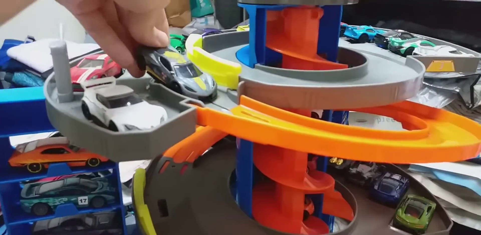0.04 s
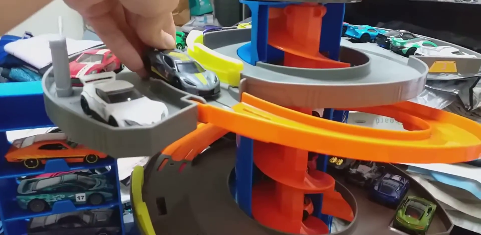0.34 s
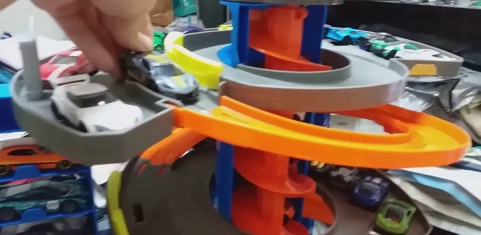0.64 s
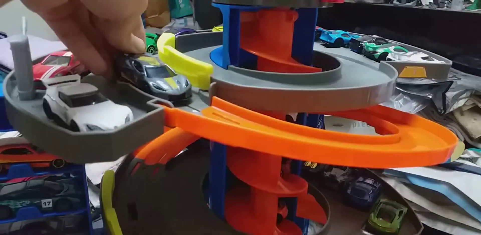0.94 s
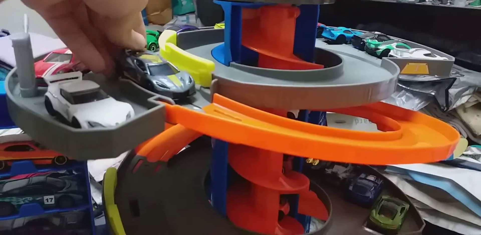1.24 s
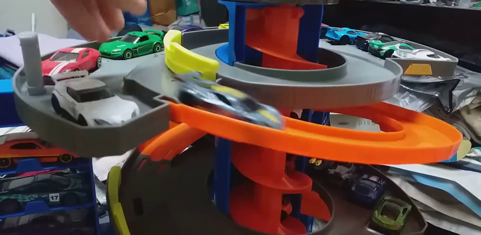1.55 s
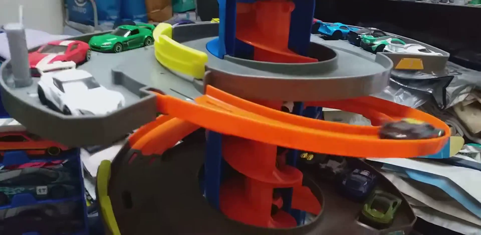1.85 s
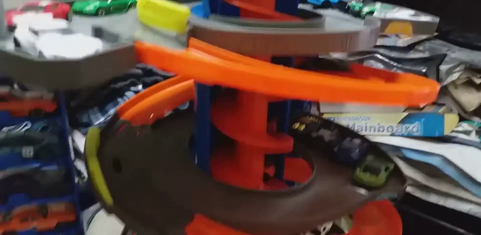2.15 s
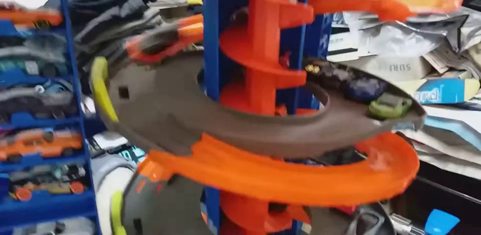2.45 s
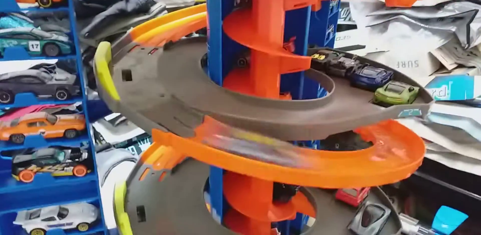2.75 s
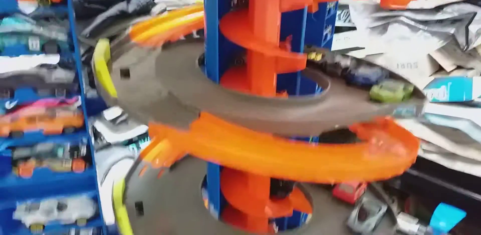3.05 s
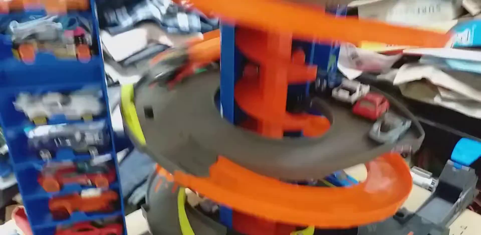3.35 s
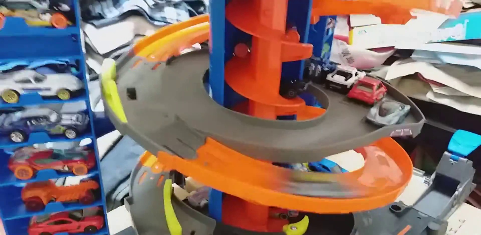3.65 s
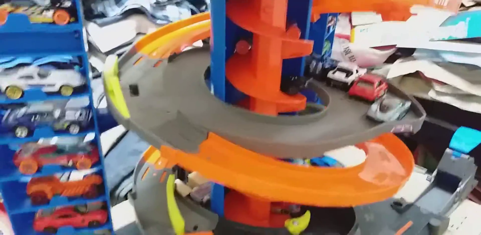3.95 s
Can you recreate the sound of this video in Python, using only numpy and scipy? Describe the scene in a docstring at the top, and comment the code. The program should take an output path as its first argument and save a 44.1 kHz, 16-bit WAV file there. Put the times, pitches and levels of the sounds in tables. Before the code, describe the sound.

A small metal toy car rattles down a plastic spiral track, close by in a quiet room. At first there is only soft hiss and a faint, dull tap at about 0.5 seconds. Near 1.4 seconds the car clacks onto the track and rolls, wheels chattering over a hollow rumble. From 2 seconds it grows louder, with sharp clacks, brief scrapes and knocks continuing until about 4 seconds.

```python
"""A die-cast toy car rattles down a plastic spiral track, close to one microphone in a quiet room.
After a dull tap while it is held, the car is let go. Its hard wheels chatter over the plastic and
make the track sing and rumble; the metal body clacks against walls and joints and scrapes the outer
wall, and the bigger blows knock the hollow tower. Short echoes shift as the car circles, over a
few low thumps like handling noise, a soft hiss and a faint hum."""
import sys
import numpy as np
from scipy import signal
from scipy.io import wavfile
from scipy.ndimage import uniform_filter1d, map_coordinates

SR = 44100
rng = np.random.default_rng(int(sys.argv[2]) if len(sys.argv) > 2 else 0)


def waveform_to_disk(signal):
    """Save audio, clipped to [-1, 1], as 16-bit WAV at the path in sys.argv[1]."""
    frames = np.transpose(np.atleast_2d(signal))
    scaled = np.clip(frames, -1, 1) * 32767
    samples = np.round(scaled).astype(np.int16)
    wavfile.write(sys.argv[1], SR, samples)


N = 176400
TIME = np.arange(N) / SR
CLACK_S = 0.004  # a clack's or ping's level is its energy spread over this span


def amp(db):
    """Decibels to gain."""
    return 10 ** (np.asarray(db) / 20)


def unit(x):
    """Scales to rms 1."""
    return x / np.sqrt(np.mean(x ** 2) + 1e-20)


def at_hz(points, hz):
    """Reads a table on a log-frequency axis."""
    freq_hz, value = np.transpose(points)
    return np.interp(np.log(hz + 1), np.log(freq_hz + 1), value)


def rolling(points):
    """Gain from a level curve; silent before its first point."""
    time_s, level_db = np.transpose(points)
    return amp(np.interp(TIME, time_s, level_db, left=-120))


def add(mix, start_s, sound):
    """Mixes a sound in at start_s."""
    part = mix[max(round(start_s * SR), 0):][:len(sound)]
    part += sound[:len(part)]


def colour(x, points, size=2048):
    """Minimum-phase filter with the given spectrum."""
    gain_db = at_hz(points, abs(np.fft.fftfreq(size, 1 / SR)))
    log_gain = np.log(amp(np.maximum(gain_db, -100)))
    taps = np.fft.ifft(np.exp(np.conj(signal.hilbert(log_gain)))).real
    return signal.fftconvolve(x, taps)[:len(x)]


def resonate(x, hz, width_hz):
    """A resonance at a steady or moving pitch."""
    turn = np.exp(2j * np.pi * np.cumsum(hz * np.ones(len(x))) / SR)
    pole = np.exp(-np.pi * width_hz / SR)
    return 2 * (turn * signal.lfilter([1 - pole], [1, -pole], x / turn)).real


def resonate_twice(x, hz, width_hz):
    """Two equal resonances in series, for steeper flanks."""
    return resonate(resonate(x, hz, width_hz), hz, width_hz)


def bumps(per_s, spread_db):
    """Random tiny impacts of uneven size."""
    size = amp(spread_db * np.minimum(rng.exponential(1, N), 4)) * rng.choice([-1, 1], N)
    return size * (rng.random(N) < per_s / SR)


def ring(clicks, decay_s, count=24, spots_per_s=14):
    """Each impact rings the spot of track under the car; every spot has its own dense, short modes."""
    t = TIME[:SR // 50]
    spot = (TIME * spots_per_s + 2 * rng.random(N)).astype(int) % count
    rings = rng.standard_normal((count, len(t))) * np.exp(-t / decay_s)
    return sum(signal.oaconvolve(clicks * (spot == k), unit(rings[k]))[:N] for k in range(count))


def axle_rattle(per_s=100, jitter=0.4, spread_db=2.5):
    """The loose axles tap in their slots at uneven intervals."""
    gap, size = rng.standard_normal((N // 100, 2)).T
    at = (np.cumsum(np.exp(jitter * gap)) * SR / per_s).astype(int)
    taps = np.zeros(N)
    taps[at[at < N]] = amp(spread_db * np.clip(size, -2, 2))[at < N]
    return ring(taps, decay_s=0.0019)


def wheels():
    """Hard wheels chatter over fine grit while their axles rattle."""
    # Strength of the chatter along the run: time_s, level_db
    chatter = [(1.48, -41.5), (1.555, -58), (1.58, -42), (1.65, -47), (1.69, -37.5), (1.72, -48.5),
               (1.8, -34), (1.89, -38.5), (2.0, -33.5), (2.1, -32.5), (2.3, -36), (2.45, -36.5), (2.5, -31),
               (2.8, -32), (3.05, -32), (3.28, -35), (3.43, -29), (3.6, -30), (3.79, -28.5), (3.88, -31.5),
               (3.93, -31.5)]
    # Spectrum of wheels on plastic: freq_hz, gain_db
    wheel_colour = [(500, -30), (1500, -19), (2100, -6), (3000, -2.5), (4000, -3), (5200, 1), (6200, -3.5),
                    (7200, 0), (8000, -3), (9000, -13), (9800, -14.5), (11200, -9.5), (12500, -17.5),
                    (16000, -20.5)]
    grit = ring(bumps(per_s=3000, spread_db=3), decay_s=0.002)
    grit = unit(colour(grit, wheel_colour))
    rattle = unit(colour(axle_rattle(), wheel_colour))
    return rolling(chatter) * (amp(0.5) * grit + amp(-3.5) * rattle)


def clacks(crack_decay_s=0.0028, shell_decay_s=0.0083, skid_s=0.00061):
    """Metal meets plastic: a short skid builds to a bright crack, then the shell rings faintly."""
    # Hits on walls and joints: start_s, rise_s, level_db, low_mid_share_db, top_share_db
    hits = [(0.1876, 0.0011, -46.5, -15, -17), (1.4293, 0.0036, -26.5, -24, -22),
            (1.4417, 0.0044, -35.5, -1, -5), (1.456, 0.0024, -25.5, -18, -6),
            (1.4586, 0.0069, -25.5, -9, -27), (1.466, 0.011, -38, 0, -15),
            (1.5844, 0.00056, -20, -14, -7.5), (1.6088, 0.0017, -32.5, -15, -26),
            (1.634, 0.00068, -30, -8, -28), (1.6699, 0.0037, -25, -9, -14), (1.7366, 0.0012, -27, -36, -6),
            (1.746, 0.00053, -30.5, -1, -16), (1.7571, 0.0008, -28.5, -16, -2),
            (1.8126, 0.0028, -25, -4, -9), (1.908, 0.0054, -24, -5, -5), (1.941, 0.0035, -25, -18, -3),
            (1.959, 0.0044, -20.5, -9, -2), (2.0414, 0.0015, -20.5, -12, -4), (2.052, 0.0037, -17, -22, -5),
            (2.062, 0.00096, -10, -26, 1), (2.195, 0.0041, -21.5, -16, 4), (2.48, 0.0028, -19.5, -15, -2),
            (2.493, 0.0019, -18.5, -10, -6), (2.5011, 0.0016, -24, -21, -4), (2.5284, 0.00078, -13, -8, -3),
            (2.5308, 0.0077, -16, 2, -2), (2.572, 0.0009, -20, -9, -4), (2.584, 0.0023, -16, -5.5, -21),
            (2.5972, 0.0009, -19, -16, -15), (2.6402, 0.0043, -15.5, -15, -5),
            (2.6663, 0.00065, -20.5, -22, 6), (2.701, 0.0055, -17.5, -11, -1),
            (2.7322, 0.0016, -18, -12, -4.5), (2.997, 0.0032, -20.5, -13, -1),
            (3.0204, 0.0013, -22.5, -25, -6), (3.0298, 0.0019, -18, -23, 3),
            (3.069, 0.0058, -19.5, -14, -6), (3.1892, 0.0037, -25.5, -25, -8), (3.368, 0.0032, -22, -16, 0),
            (3.4015, 0.0037, -20, -4, -6), (3.414, 0.0026, -26, 0, -12), (3.4259, 0.0015, -17.5, -4, -14),
            (3.44, 0.003, -17, 1, -16), (3.456, 0.0013, -24, -10, -15), (3.489, 0.0026, -14, -17, -7),
            (3.5172, 0.0032, -19, -14, -5), (3.544, 0.0042, -16.5, -29, -4), (3.56, 0.0018, -20.5, -2, 0),
            (3.5685, 0.00064, -21, -9, -13), (3.613, 0.0022, -20, -3, -19), (3.633, 0.00073, -19, -4, -14),
            (3.693, 0.0018, -23, -11, -25), (3.748, 0.0018, -22, -10, -8), (3.765, 0.0027, -25, -18, -14),
            (3.7935, 0.001, -24, -27, -5), (3.8455, 0.0061, -16.5, -13, -6), (3.8842, 0.0017, -23, -6, -12),
            (3.89, 0.0022, -24, -14, -9)]
    # Spectrum of a plain clack: freq_hz, gain_db
    clack_colour = [(300, -27), (1500, -26), (2800, -4), (4000, -2), (5200, 2), (7000, 5.5), (8000, 2),
                    (9200, -10.5), (11200, -7.5), (12500, -12), (16000, -20.5)]
    plain_low_db, plain_top_db = -11.5, -8  # shares that leave this spectrum untilted
    body_modes_hz, body_width_hz = (5154, 6630, 7500), 82
    out, t = np.zeros(N), np.arange(-SR // 100, SR // 12) / SR
    skid = amp(-24) * np.exp(-abs(t) / skid_s)
    for start_s, rise_s, level_db, low_db, top_db in hits:
        rise = np.clip(t / max(rise_s, 0.0004), 0, 1)
        after = np.maximum(t - rise_s, 0)
        fall = np.exp(-after / crack_decay_s) + amp(-29) * np.exp(-after / shell_decay_s)
        burst = (skid + rise * fall) * rng.choice([-1, 1], len(t))
        tilt = [(3000, low_db - plain_low_db), (5000, 0), (8000, 0), (11000, top_db - plain_top_db)]
        crack = colour(colour(burst, clack_colour), tilt)
        # Each blow wakes the metal body's modes differently.
        body = sum(rng.random() * resonate(crack, hz, body_width_hz) for hz in body_modes_hz)
        clack = crack + amp(5) * body
        add(out, start_s, amp(level_db - 1.5) * clack / np.linalg.norm(clack) * np.sqrt(CLACK_S * SR))
    return out


def scrapes():
    """Where the car leans on the outer wall, fine slips swell and fade in a bright rasp."""
    # Contacts with the wall: start_s, length_s, level_db
    contacts = [(1.368, 0.063, -63), (1.935, 0.14, -36), (2.456, 0.022, -36), (2.712, 0.066, -30),
                (2.953, 0.14, -34), (3.14, 0.056, -35.5), (3.544, 0.042, -29), (3.825, 0.055, -27.5),
                (3.862, 0.053, -29.5)]
    # Spectrum of the rasp: freq_hz, gain_db
    rasp_colour = [(2000, -33), (4500, -52), (6300, -7), (7500, 3), (8300, -3), (9500, -21), (11300, -10.5),
                   (16000, -19)]
    swell = np.zeros(N)
    for start_s, length_s, level_db in contacts:
        add(swell, start_s, amp(level_db) * np.hanning(round(length_s * SR)))
    slips = ring(bumps(per_s=1700, spread_db=5), decay_s=0.0015)
    return amp(3.5) * swell * unit(colour(slips, rasp_colour))


def pings(decay_s=0.002, width_hz=490):
    """A light touch rings one short, high mode of the plastic."""
    # Light touches of the car: start_s, pitch_hz, level_db
    touches = [(0.1875, 5060, -47), (1.609, 5200, -29), (1.7563, 5630, -28), (2.042, 5270, -26),
               (2.708, 5470, -22), (3.411, 5060, -25), (3.5685, 4880, -31)]
    out, t = np.zeros(N), TIME[:SR // 20]
    shape = np.exp(-t / decay_s)
    for start_s, pitch_hz, level_db in touches:
        ping = resonate_twice(shape * rng.standard_normal(len(t)), pitch_hz, width_hz)
        add(out, start_s, amp(level_db) * ping / np.linalg.norm(ping) * np.sqrt(CLACK_S * SR))
    return out


def track():
    """The rolling wheels drive the track's moving ring, its hollow rumble and the tower's low drone."""
    # Ring of the track under the wheels: time_s, pitch_hz, level_db
    sing_curve = [(1.56, 2620, -50), (1.74, 2520, -47.5), (1.82, 2800, -35), (1.89, 2700, -34.5),
                  (1.93, 2060, -37.5), (2.02, 2450, -34), (2.1, 2670, -43.5), (2.42, 2680, -43.5),
                  (2.53, 2550, -32), (2.74, 2650, -49), (2.83, 2700, -30), (2.92, 2750, -31.5),
                  (3.06, 2600, -42), (3.17, 2910, -38.5), (3.3, 2380, -39), (3.44, 3070, -35.5),
                  (3.59, 2620, -43), (3.68, 2840, -23), (3.78, 2760, -37), (4.0, 2450, -52)]
    # Strength of the rumble: time_s, level_db
    rumble_curve = [(1.2, -73), (1.43, -64), (1.55, -57.5), (1.6, -50), (1.72, -53.5), (1.81, -47),
                    (2.08, -48.5), (2.19, -51.5), (2.28, -48), (2.45, -47), (2.51, -43.5), (2.68, -49),
                    (2.78, -46.5), (3.03, -50), (3.28, -47), (3.52, -41), (3.62, -47.5), (3.8, -43),
                    (3.88, -42.5), (4.0, -46.5)]
    # Spectrum of the rumble: freq_hz, gain_db
    rumble_colour = [(88, -35), (150, -19.5), (187, -1), (220, 0), (382, 1), (548, -2.5), (591, -3.5),
                     (636, -5.5), (778, -0.5), (983, -2.5), (1230, -2.5), (1500, -4.5), (1900, -4.5),
                     (2470, -9.5), (4180, -120)]
    # Strength of the drone: time_s, level_db
    drone_curve = [(1.56, -54), (1.6, -49), (1.72, -66), (2.1, -55.5), (2.35, -62), (2.52, -59.5),
                   (3.2, -58), (3.42, -49.5), (3.65, -51.5), (3.74, -56), (3.9, -44), (4.0, -46.5)]
    # Low modes of the tower: pitch_hz, width_hz, level_db
    tower_modes = [(60, 39, -42), (125.3, 34, -8), (203, 55, 0.5), (274, 125, -4.5)]
    drive = bumps(per_s=2500, spread_db=2)
    time_s, pitch_hz, level_db = np.transpose(sing_curve)
    ringing = resonate_twice(drive, np.interp(TIME, time_s, pitch_hz), width_hz=340)
    sing = rolling(np.c_[time_s, level_db]) * unit(ringing)
    rumble = rolling(rumble_curve) * unit(colour(drive, rumble_colour))
    modes = sum(amp(db) * unit(resonate_twice(drive, hz, width)) for hz, width, db in tower_modes)
    drone = rolling(drone_curve) * unit(modes)
    return amp(-5.5) * sing + amp(0.5) * (rumble + drone)


def dull_blows(blows, spectrum, decay_s):
    """Blows on hollow plastic: short noise bursts of the given colour."""
    out, t = np.zeros(N), TIME[:SR // 8]
    shape = np.exp(-t / decay_s)
    for start_s, level_db in blows:
        blow = colour(shape * rng.standard_normal(len(t)), spectrum)
        add(out, start_s, amp(level_db) * unit(blow) * np.sqrt(np.mean(shape ** 2)))
    return out


def knocks():
    """The car's bigger blows shake the hollow track."""
    # Heavy hits: start_s, level_db
    blows = [(1.432, -41.5), (1.458, -33.5), (1.470, -38.5), (1.482, -37), (2.055, -34.5), (2.494, -30.5),
             (2.529, -32), (2.584, -32.5), (2.642, -28), (2.699, -35), (3.023, -34.5), (3.402, -32),
             (3.490, -25), (3.543, -32), (3.690, -34), (3.846, -32.5), (3.880, -36)]
    # Spectrum of a hollow knock: freq_hz, gain_db
    knock_colour = [(40, -83), (120, -31), (250, 2), (400, 1), (620, -1.5), (850, 5), (1200, -1),
                    (2000, -3.5), (4000, -9), (8000, -86)]
    return amp(-2) * dull_blows(blows, knock_colour, decay_s=0.013)


def held_tap(start_s=0.5415, level_db=-42.5):
    """One dull tap while the car is still held."""
    # Spectrum of the tap: freq_hz, gain_db
    tap_colour = [(100, -5), (330, 3), (550, -2), (1050, 0), (1600, -20), (4000, -50)]
    return dull_blows([(start_s, level_db)], tap_colour, decay_s=0.002)


def thumps(pitch_hz=109, decay_s=0.0044):
    """Soft low thumps, a cycle or two each, like handling of the camera."""
    # Low thumps: start_s, peak_db
    low_thumps = [(0.544, -57), (1.589, -55), (2.509, -52), (3.407, -44)]
    out, t = np.zeros(N), TIME[:SR // 10]
    age = t / decay_s
    thump = age * np.exp(1 - age) * np.sin(2 * np.pi * pitch_hz * t)
    for start_s, peak_db in low_thumps:
        add(out, start_s, amp(peak_db) * thump)
    return out


def deck_resonance(x):
    """The plastic decks add their own narrow resonances to the sound that shakes them."""
    # Modes of the decks: pitch_hz, width_hz, gain_db
    deck_modes = [(385, 24, -7), (592, 20, -6), (968, 45, -6), (1950, 40, -8), (2474, 40, -10),
                  (2906, 22, -7), (3495, 25, -9), (3897, 27, -6), (4474, 22, -8), (6129, 25, -13),
                  (6680, 55, -14)]
    return x + sum(amp(db) * resonate(x, hz, width) for hz, width, db in deck_modes)


def deck_reflection(x, lap_s=0.98, mid_delay_s=0.0008):
    """The deck throws sound back; the path lengthens and shortens each lap, so the colour shifts."""
    delay_s = mid_delay_s * 2 ** np.sin(2 * np.pi * TIME / lap_s)
    return x + amp(-11) * map_coordinates(x, [(TIME - delay_s) * SR], order=3)


def echoes(count=10, early_db=-10.5, tail_db=-11):
    """Early echoes from the decks of the tower, then the short tail of a furnished room."""
    # Reverberation time of the room: freq_hz, t60_s
    room_decay = [(200, 0.71), (1000, 0.42), (4000, 0.32), (12000, 0.38)]
    early = np.zeros(SR // 30)
    early[rng.integers(SR // 400, len(early) // 2, count)] = rng.choice([-1, 1], count) / np.sqrt(count)
    hz, t, noise = signal.stft(rng.standard_normal(SR // 2), SR, nperseg=256)
    fade = amp(-60 * t / at_hz(room_decay, hz)[:, None])
    response = signal.istft(noise * fade, SR)[1]
    response[:SR // 200] = 0  # the tail reaches the microphone 5 ms late
    response *= amp(tail_db) / np.linalg.norm(response)
    add(response, 0, amp(early_db) * early)
    return response


def room(x, count=8, places_per_s=9):
    """Each place on the spiral has its own echoes; the car glides from one to the next."""
    out = x.copy()
    for k in range(count):
        away = abs((TIME * places_per_s - k) % count - count / 2)
        crossfade = np.cos(np.pi / 2 * np.minimum(away, 1))
        out += signal.fftconvolve(x * crossfade, echoes())[:N]
    return out


def room_tone(hum_hz=720, waver_hz=6):
    """Soft steady hiss with a faint, slightly wavering hum."""
    # Spectrum of the quiet room: freq_hz, gain_db
    air_colour = [(25, -35), (60, -7.5), (120, -2.5), (220, -10.5), (350, -5), (550, -9), (900, -9),
                  (1400, -10), (2050, -5), (2800, -9), (3500, -6), (4700, -7), (8000, -12), (9300, -24),
                  (11000, -21.5), (12500, -28), (16000, -26)]
    hiss, drift = rng.standard_normal((2, N))
    pitch_hz = hum_hz + waver_hz * unit(uniform_filter1d(drift, SR // 20))
    hum = np.sin(2 * np.pi * np.cumsum(pitch_hz) / SR)
    return amp(-58) * unit(colour(hiss, air_colour)) + amp(-75.5) * unit(hum)


def scene():
    """The car on its track and the room around it, in mono at the microphone."""
    car = deck_reflection(wheels()) + scrapes() + track() + clacks() + pings() + knocks()
    background = room_tone()
    foreground = deck_resonance(car) + thumps() + held_tap()
    return (room(foreground) + background)[None]


def record(dry):
    """The recorder cuts the treble above about 16 kHz."""
    lowpass = signal.firwin(511, 16050, window=("kaiser", 8), fs=SR)
    return signal.oaconvolve(dry, lowpass[None], "same")


dry = scene()
out = record(dry)
waveform_to_disk(out)
```